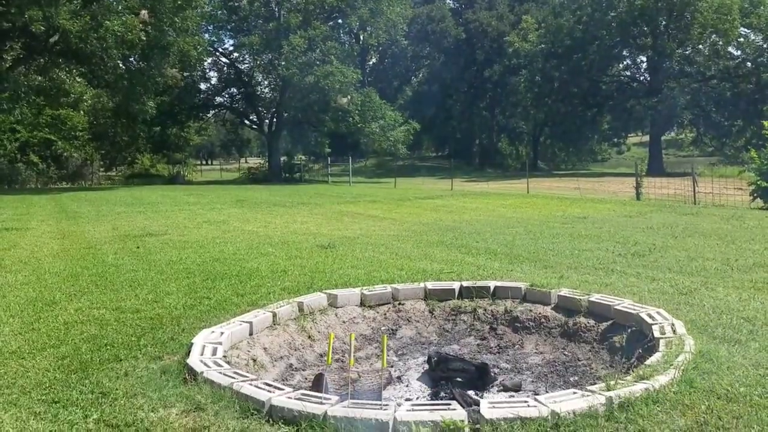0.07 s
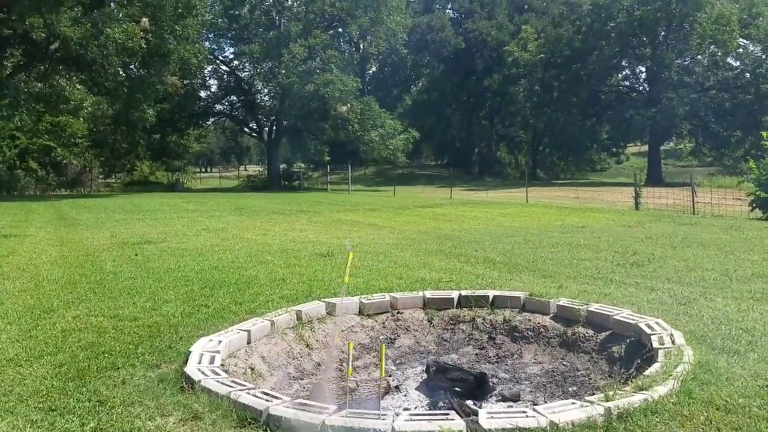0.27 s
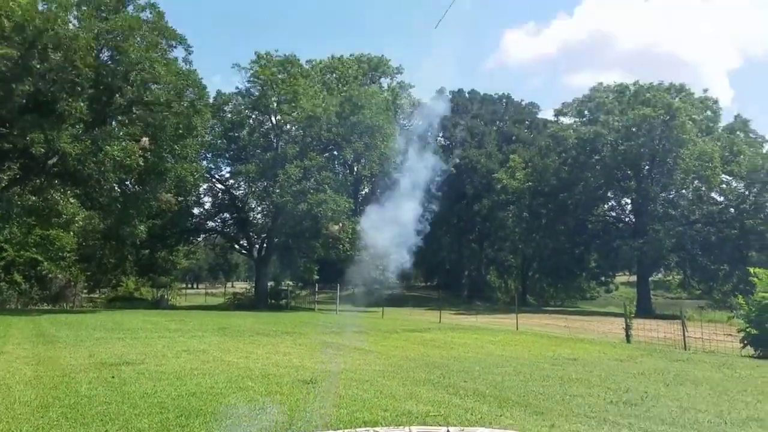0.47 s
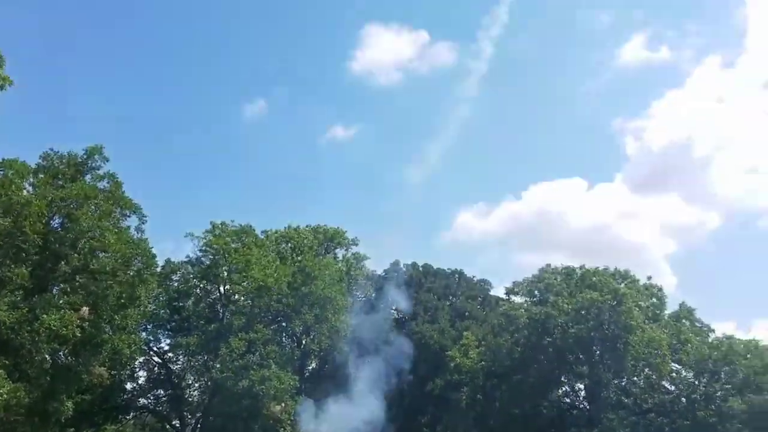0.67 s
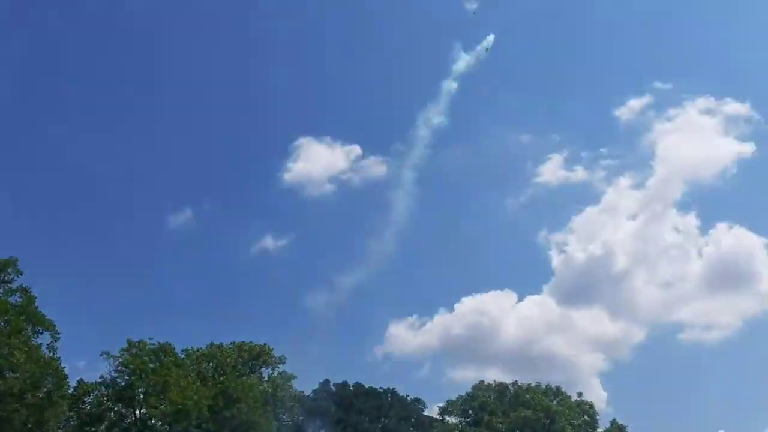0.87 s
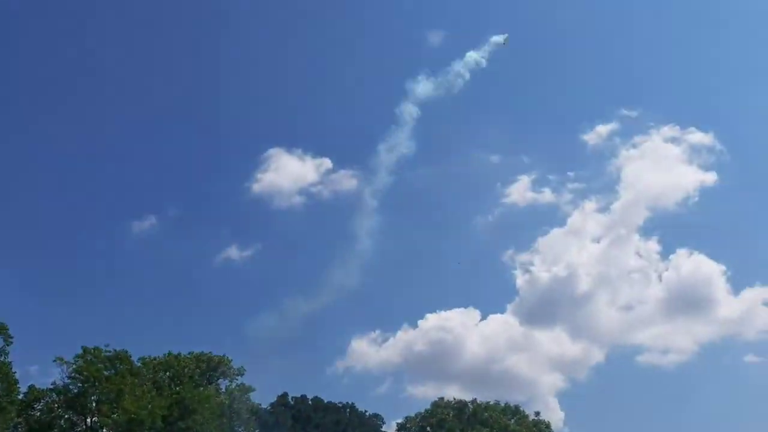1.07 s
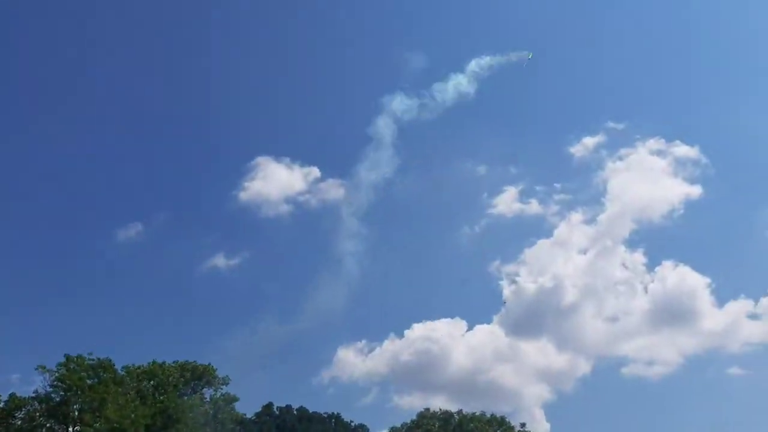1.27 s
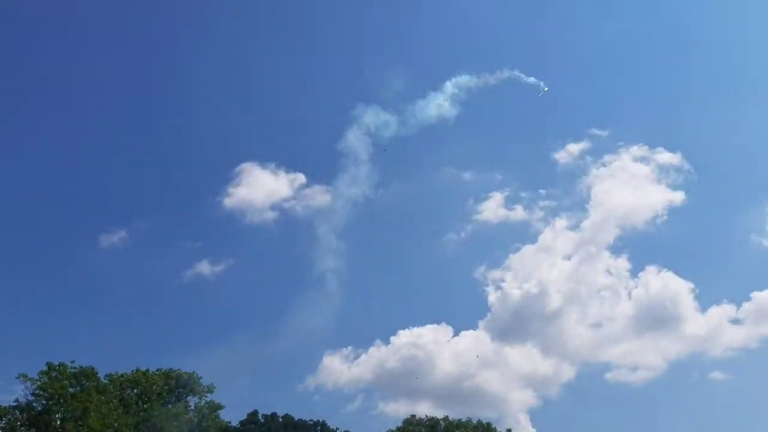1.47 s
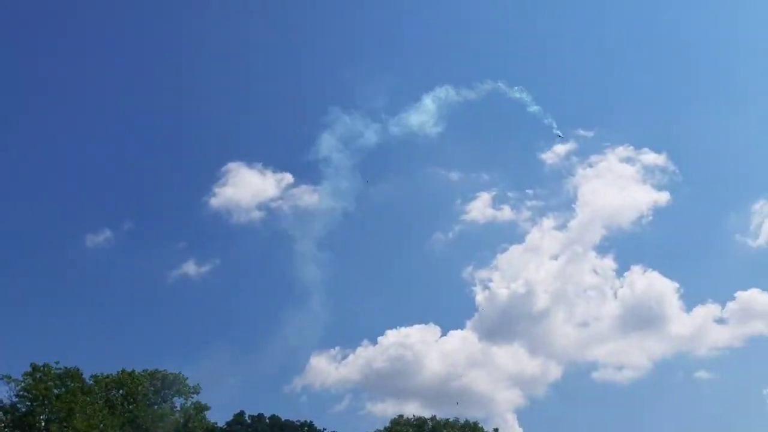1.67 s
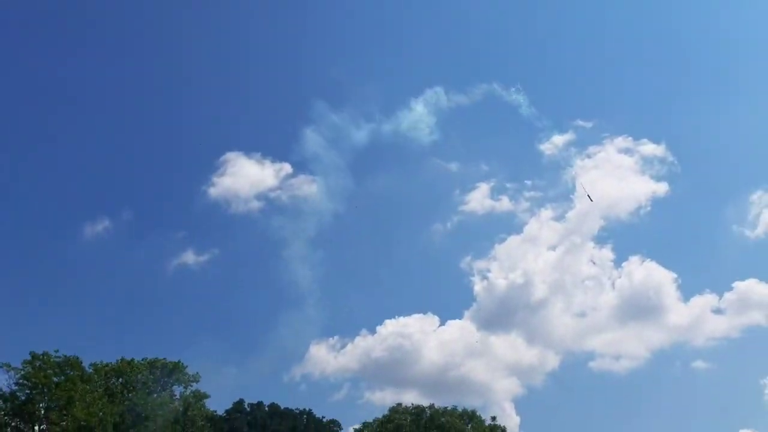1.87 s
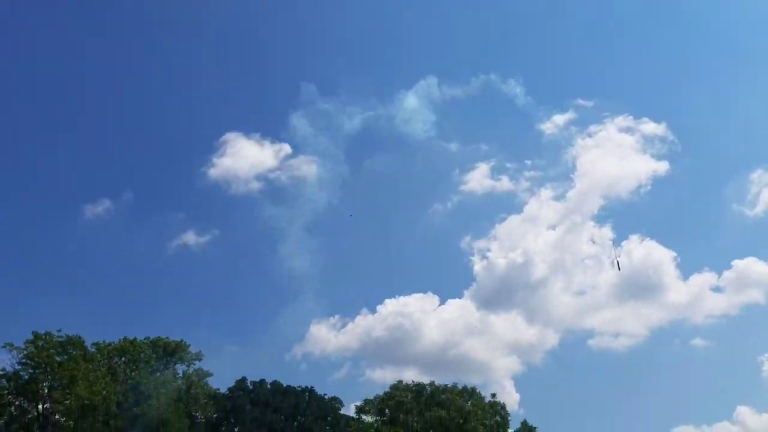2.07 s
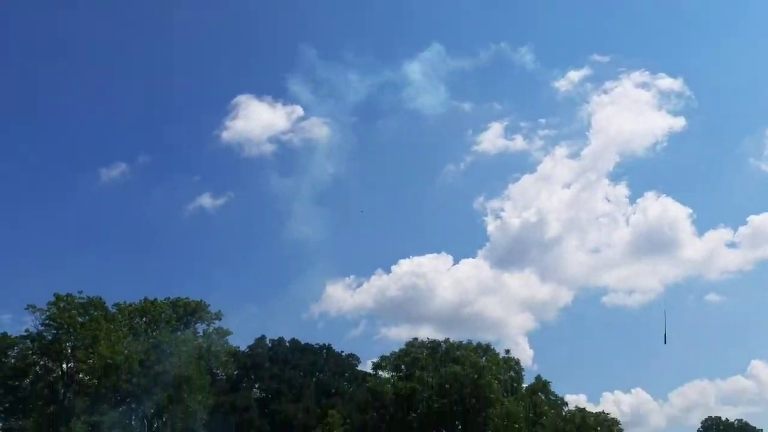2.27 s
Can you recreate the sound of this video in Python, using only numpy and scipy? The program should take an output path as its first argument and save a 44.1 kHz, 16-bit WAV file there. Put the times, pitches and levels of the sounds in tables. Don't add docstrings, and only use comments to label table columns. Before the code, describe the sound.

A small firework rocket launches in an open yard. A faint fuse fizz and the tail of a bird chirp open over low rumble. At about 0.2 seconds a harsh, crackling whoosh bursts out with a light stick knock, dulling and fading by 0.8. Two sharp cracks follow at 0.84 and 0.95, with hollow booms and quick echoes off trees, then another fuse fizz slowly rises from 1.6 until 2.3.

```python
import sys
import numpy as np
from scipy import signal
from scipy.fft import irfft
from scipy.io import wavfile
from scipy.ndimage import uniform_filter1d

SR = 44100
rng = np.random.default_rng(int(sys.argv[2]) if len(sys.argv) > 2 else 0)


def master(y):
    cut = np.clip(np.atleast_2d(y).T, -1, 1)
    pcm = np.round(cut * 32767)
    wavfile.write(sys.argv[1], SR, pcm.astype(np.int16))


def convert_level_to_amplitude(level_db):
    exponent = np.asarray(level_db, float) / 20
    return 10 ** exponent


N = 101429

# (frequency [Hz], likeness [0-1])
LIKENESS = [(60, 0.95), (300, 0.59), (700, 0.39), (2000, 0.37), (5000, 0.14), (14000, 0.64)]
# (frequency [Hz], level [dB])
LEAN_DB = [(60, 1), (180, -1), (550, 0), (1650, 1), (4970, 2.5), (15000, 2)]
# (frequency [Hz], phase [rad])
LAG_RAD = [(100, 1.4), (500, 0.25), (2500, 0.44), (6000, 1.29), (13000, 1.8)]

# (time [s], level [dB])
AIR_LEVEL = [(0, -56), (.18, -56), (.22, -76), (.3, -76), (.6, -64), (.8, -63.5), (1.05, -68), (1.3, -69),
             (1.6, -68.5), (1.76, -59.5), (2.3, -58)]
# (frequency [Hz], level [dB])
AIR_COLOUR = [(18, -33), (30, -1), (49, -13), (118, 6.5), (210, -14), (290, -4.5), (563, -13.5),
              (2080, -13), (5000, -21.5), (6500, -42), (11000, -120)]
# (start [s], length [s], from [Hz], to [Hz], level [dB])
CHIRPS = [(0, .035, 2200, 2600, -57)]
# (time [s], level [dB])
FUSE_LEVEL = [
    (0, -45.5),
    (.17, -45.5),
    (.3, -56),
    (.8, -75),
    (1.5, -75.5),
    (1.7, -63.5),
    (2.0, -60),
    (2.3, -55.5),
]
# (frequency [Hz], level [dB])
FIRST_FIZZ = [(400, -34), (1100, -37), (1600, -8), (3000, -7), (5000, -2.5), (6500, 3), (10000, 0),
              (15000, -4.5)]
# (frequency [Hz], level [dB])
SECOND_FIZZ = [(1100, -26), (3000, -9), (5000, -2.5), (6500, 6), (8000, 3.5), (10000, -5), (12500, 1.5),
               (15000, 0)]

# (time [s], level [dB], distance dullness [0-1])
THRUST = [
    (.15, -49, 0.1),
    (.21, -24.5, 0.07),
    (.25, -14.5, 0.02),
    (.30, -16, 0.08),
    (.38, -16.5, 0.3),
    (.47, -30.5, 0.27),
    (.56, -39.5, 0.88),
    (.64, -44, 1),
    (.82, -58, 0.93),
]
# (time [s], level [dB], width [s])
SURGES = [(.222, 2, 0.0052), (.262, -2, 0.013), (0.291, 1.5, .005), (.308, -0.5, .006), (.322, 3, .006),
          (.365, 2, 0.013), (.432, -3.5, 0.0058), (.447, 2.5, 0.0068), (.61, 0.5, 0.012)]
# (frequency [Hz], level [dB])
NEAR_JET = [(150, -52.5), (450, -23), (700, -35.5), (1150, -38), (1500, -2), (4500, -2.5), (6500, 2),
            (15000, -2)]
# (frequency [Hz], level [dB])
FAR_JET = [(120, -38.5), (300, -1), (700, -2), (1500, 0), (2500, -5), (4000, -9.5), (8000, -6), (15000, -7)]
CRACKLE_PER_S, CRACKLE_DB, CRACKLE_SPREAD_DB = 9700, -12, 4.5
JET_LOW_HZ = 1190
# (time [s], frequency [Hz], level [dB],
# t60 [s])
KNOCK = [(.232, 296, -33.5, 0.08), (.23, 510, -25.5, 0.096), (.222, 927, -35, 0.14), (.255, 460, -30, .15),
         (.265, 900, -37, 0.18), (.285, 1020, -41, 0.12), (.285, 540, -32, 0.17), (.346, 142, -26.5, 0.14)]
# (time [s], peak [dB], pitch [Hz], length [cycles])
SPIT = [(.2428, -10, 2600, 2.2), (.2429, -10, 5500, 2.2)]
# (frequency [Hz], level [dB])
SWEEP_COLOUR = [(60, -4), (150, 3), (250, -6.5), (600, 0), (1200, 1.5), (3000, -9), (8000, -29.5)]
SWEEP_S, SWEEP_WIDTH_S, SWEEP_DB = 0.3526, 0.014, -18.5

# (time [s], strength [dB], shock front [dB])
POPS = [
    (0.8392, -4.5, -1),
    (0.9505, -6.5, 5),
]
# (frequency [Hz], level [dB])
CRACK_COLOUR = [(100, -19.5), (400, 2), (900, -4), (2000, -1.5), (4000, -13), (7500, -23.5), (14000, -14.5)]
CRACK_S, CRACK_DB, CRACK_RELEASE_S = .0036, -12.5, 0.00037
# (port [0 left, 1 right], delay [s], step [full scale], lead-in [s], relax [s])
FRONTS = [(0, 0.0002, 0.55, 0.000079, 0.00013), (0, 0.002525, 0.38, 0.0003, 0.00083),
          (1, 0.000216, -0.34, 0.000075, 0.00052), (1, 0.00131, -0.37, 0.00061, 0.00016),
          (1, .0035, -0.39, 0.00014, 0.0007)]
# (time [s], frequency [Hz], level [dB], t60 [s])
BOOM = [(.8395, 413, -23, 0.058), (.8395, 589, -19.5, 0.058), (.951, 128, -20, 0.035),
        (.951, 572, -16.5, 0.026), (.951, 1330, -22, 0.023)]
# (delay [s], level [dB], t60 before each band's share [s], tilt above the middle [dB/octave], below it
# [dB/octave])
TAILS = [
    (.002, -21.5, 0.055, 2.5, -2.5),
    (0.012, -24, 0.48, -0.57, -1),
    (.075, -30, 0.22, -7, -3.5),
    (0.099, -46.5, 2.37, -6, -0.5),
    (0.239, -42, 0.45, -5, -6),
    (0.329, -50, 0.38, -5, 1.5),
]
# (frequency [Hz], level [dB])
SCATTER_COLOUR = [(100, -22.5), (300, -4.5), (1200, -3.5), (2100, 1.5), (3200, -2.5), (4500, -5.5),
                  (7000, -7.5), (14000, -6)]
# (frequency [Hz], share of t60 [0-1])
T60_SHARE = [(100, 0.11), (500, 0.96), (2000, 0.84), (5000, 0.97), (14000, 0.83)]
RUSTLE_PER_S, RUSTLE_DB = 900, -15
# (time [s], peak [dB], pitch [Hz], length [cycles])
GROUND = [(.8451, 0, 2300, 1.1), (.9568, -2.5, 1700, 1.1), (.9576, -8, 2200, 1.1)]
# (time [s], peak [dB], pitch [Hz], length [cycles])
ECHOES = [(.8962, -16, 2200, 1.5), (.8975, -22, 1500, 1.8), (.9655, -16, 2500, 1.5),
          (1.0068, -19, 1950, 2.4), (1.03, -26, 2300, 2.4), (1.045, -27, 2200, 2.4),
          (1.165, -38, 2000, 2.6), (1.183, -37, 2100, 2.4), (1.217, -36, 2100, 2.2),
          (1.3249, -36, 2000, 2.0), (1.3826, -43, 1880, 1.8), (1.397, -45, 2000, 2.2),
          (1.44, -49, 1900, 2.2), (1.4879, -42, 2250, 1.8), (1.5005, -44, 2400, 1.8),
          (1.5962, -46, 1900, 1.6), (1.9753, -47, 2400, 2.6), (2.0826, -47.5, 2400, 2.4)]
SMEAR_DB, SMEAR_T60_S = -15, 0.033

DUCK_AHEAD_S, DUCK_DB = .016, -14
# (frequency [Hz], level under the whole [dB])
MASK = [(100, -35), (700, -30), (1250, -27), (1300, -80), (8500, -80), (8600, -41), (12400, -41),
        (12500, -80)]
MASK_DEPTH_DB, POP_GUARD_S = -29, .05
# (frequency [Hz], level [dB])
MIC = [(30, -15), (100, -3), (8100, 2), (8600, -3.5), (10500, -2.5), (13000, 4.5), (14500, 6.5)]
EDGE_HZ, CEILING = 14540, .9


def evened(x):
    return x / np.sqrt(np.mean(x ** 2) + 1e-20)


def read(points, hz):
    f, value = np.transpose(points)
    return np.interp(np.log(hz + 1), np.log(f + 1), value)


def curve(rows, column=1):
    rows = np.array(rows)
    return np.interp(np.arange(N) / SR, rows[:, 0], rows[:, column])


def noise(colour, patchy_db, flicker_db, like=1., lean_db=0., size=256):
    frames, hz = 4 * N // size + 5, np.fft.rfftfreq(size, 1 / SR)
    a, b, c, d, patches = rng.standard_normal((frames, len(hz), 5)).T
    patches = uniform_filter1d(patches, size=5, axis=0)
    patches = evened(uniform_filter1d(patches, size=4096 // size, axis=1))
    flicker = evened(uniform_filter1d(rng.standard_normal(frames), size=1024 // size))
    same = np.clip(like * read(LIKENESS, hz), 0, 1)[:, None]
    left = a + 1j * b
    right = same * left + np.sqrt(1 - same ** 2) * (c + 1j * d)
    right = right * np.exp(-1j * read(LAG_RAD, hz))[:, None]
    lean = convert_level_to_amplitude((read(LEAN_DB, hz) + lean_db)[:, None] / 2)
    level_db = read(colour, hz)[:, None] + patchy_db * patches + flicker_db * flicker
    z = np.array([left * lean, right / lean]) * convert_level_to_amplitude(level_db)
    return evened(signal.istft(z, nperseg=size, noverlap=size * 3 // 4)[1][:, :N])


def grit(rate_per_s, depth_db, spread_db, size=8):
    grains = convert_level_to_amplitude(spread_db * np.minimum(rng.exponential(1, N), 5))
    grains = grains * (rng.random(N) < rate_per_s / SR)
    return evened(1 + convert_level_to_amplitude(depth_db) * evened(uniform_filter1d(grains, size=size)))


def rings(rows, rise_s):
    t, out = np.arange(N) / SR, np.zeros(N)
    for at, hz, db, t60 in rows:
        fade = convert_level_to_amplitude(db - 60 * np.maximum(t - at, 0) / t60)
        out += fade * np.clip((t - at) / rise_s, 0, 1) * np.sin(2 * np.pi * hz * (t - at))
    return out


def snaps(rows):
    t, out = np.arange(N) / SR, np.zeros(N)
    for at, peak_db, hz, cycles in rows:
        u = (t - at) * hz
        skewed = np.where(u < 0, 1.98 * u, u)
        out += convert_level_to_amplitude(peak_db) * np.cos(2 * np.pi * u - .4) * np.exp(-skewed ** 2 / cycles ** 2 * 2.43)
    return out * convert_level_to_amplitude(np.array([[.5], [-.5]]))


def air():
    return convert_level_to_amplitude(curve(AIR_LEVEL)) * noise(AIR_COLOUR, patchy_db=.8, flicker_db=.6, size=1024)


def bird():
    t, out = np.arange(N) / SR, np.zeros(N)
    for start, length, from_hz, to_hz, db in CHIRPS:
        u = np.clip((t - start) / length, 0, 1)
        phase = 2 * np.pi * np.cumsum(from_hz + (to_hz - from_hz) * u) / SR
        out += convert_level_to_amplitude(db) * np.sin(np.pi * u) ** .5 * np.sin(phase)
    return out


def fuses():
    late = np.arange(N) > SR
    first = noise(FIRST_FIZZ, patchy_db=1.2, flicker_db=.5, lean_db=1.0)
    second = noise(SECOND_FIZZ, patchy_db=1.0, flicker_db=0.8, lean_db=4.5)
    return convert_level_to_amplitude(curve(FUSE_LEVEL)) * np.where(late, second, first)


def motor():
    t, far = np.arange(N) / SR, np.clip(curve(THRUST, column=2), 0, 1)
    near_jet = np.sqrt(1 - far) * noise(NEAR_JET, patchy_db=2.0, flicker_db=.6, size=512)
    near_jet = near_jet * grit(CRACKLE_PER_S, CRACKLE_DB, CRACKLE_SPREAD_DB)
    near_jet = signal.sosfilt(signal.butter(4, JET_LOW_HZ, "high", fs=SR, output="sos"), near_jet)
    far_jet = np.sqrt(far) * noise(FAR_JET, patchy_db=1.2, flicker_db=1.1, size=512)
    burning = (t > THRUST[0][0] - .05) & (t < THRUST[-1][0] + .02)
    surge_db = sum(db * np.exp(-((t - at) / width) ** 2 / 2) for at, db, width in SURGES)
    return (near_jet + far_jet) * convert_level_to_amplitude(curve(THRUST) + surge_db) * burning


def knock():
    return rings(KNOCK, rise_s=0.011)


def spit():
    return snaps(SPIT)


def exhaust_sweep():
    gust = np.exp(-((np.arange(N) / SR - SWEEP_S) / SWEEP_WIDTH_S) ** 2 / 2)
    return convert_level_to_amplitude(SWEEP_DB) * gust * noise(SWEEP_COLOUR, patchy_db=3.0, flicker_db=3.0, size=1024)


def pops():
    t, out = np.arange(N) / SR, np.zeros((2, N))
    crack = noise(CRACK_COLOUR, patchy_db=1.5, flicker_db=1.5, like=.3, lean_db=-1.1)
    for start, strength_db, front_db in POPS:
        gate = (t > start) * np.clip((start + CRACK_S - t) / CRACK_RELEASE_S + 1, 0, 1)
        out += convert_level_to_amplitude(strength_db + CRACK_DB) * crack * gate
        for port, delay, step, lead_in, relax in FRONTS:
            u = t - start - delay
            bell = np.exp(-(u / np.where(u < 0, lead_in, relax)) ** 2)
            out[port] += convert_level_to_amplitude(front_db) * step * np.tanh(u / .00004) * bell
    return out


def case_boom():
    return rings(BOOM, rise_s=0.0021) * convert_level_to_amplitude(np.array([[2.5], [-2.5]]))


def scatter():
    t, out = np.arange(N) / SR, np.zeros((2, N))
    rustle = grit(RUSTLE_PER_S, RUSTLE_DB, spread_db=3.0, size=40)
    for delay, level_db, t60, tilt_db, low_db in TAILS:
        rough = rustle * noise(SCATTER_COLOUR, patchy_db=2.0, flicker_db=1.1, like=0.12)
        hz, at, z = signal.stft(rough, SR, nperseg=128, noverlap=96)
        octaves = np.log2(np.maximum(hz, 500) / 2200)[:, None]
        dull_db = np.where(octaves > 0, tilt_db, -low_db) * octaves
        band_t60 = t60 * read(T60_SHARE, hz)[:, None]
        fade = 0
        for start, strength_db, _ in POPS:
            u = at - start - delay
            fade_db = strength_db + 7 + level_db + dull_db - 60 * np.maximum(u, 0) / band_t60
            fade = fade + convert_level_to_amplitude(fade_db) * np.clip(u / min(delay, .04) + 1, 0, 1) ** 2
        out += signal.istft(z * fade, SR, nperseg=128, noverlap=96)[1][:, :N] * (t > POPS[0][0])
    return out


def echoes():
    t, smear = np.arange(N) / SR, np.zeros(N)
    for at, peak_db, _, _ in GROUND + ECHOES:
        smear += convert_level_to_amplitude(peak_db + SMEAR_DB - 60 * np.maximum(t - at, 0) / SMEAR_T60_S) * (t > at)
    rough = noise(CRACK_COLOUR, patchy_db=1.5, flicker_db=2.5, lean_db=-1.5)
    return snaps(GROUND + ECHOES) + smear * rough


def scene():
    ahead = (POPS[0][0] - np.arange(N) / SR) / DUCK_AHEAD_S
    dip = convert_level_to_amplitude(DUCK_DB * np.clip(4 * (1 - ahead), 0, 1) * (ahead > 0))
    quiet = air() + bird() + fuses() + motor() + knock() + exhaust_sweep()
    return dip * quiet + spit() + pops() + case_boom() + scatter() + echoes()


def masked(x):
    hz, at, z = signal.stft(x, SR, nperseg=2048, noverlap=1024)
    power = (abs(z) ** 2).sum(axis=0)
    band = np.repeat(power[:-1].reshape(256, 4, -1).sum(axis=1), repeats=4, axis=0)
    band_db = 10 * np.log10(np.vstack([band, band[-1:]]) / power.sum(axis=0) + 1e-12)
    under_db = read(MASK, hz)[:, None] - band_db
    clear_of_pops = abs(at - np.array(POPS)[:, :1]).min(axis=0) > POP_GUARD_S
    keep = convert_level_to_amplitude(MASK_DEPTH_DB * np.clip(under_db / 2, 0, 1) * clear_of_pops)
    return x - signal.istft(z * (1 - keep), SR, nperseg=2048, noverlap=1024)[1][:, :N]


def low_pass(x):
    return signal.sosfilt(signal.butter(12, 15900, fs=SR, output="sos"), x)


def record(dry):
    colour = irfft(convert_level_to_amplitude(read(MIC, np.fft.rfftfreq(512, 1 / SR))))
    colour = np.roll(colour, 256) * np.hanning(513)[:512]
    band_limit = signal.firwin(301, EDGE_HZ, window=("kaiser", 9), fs=SR)
    taps = np.convolve(colour, band_limit)[1:]
    steady = signal.sosfilt(signal.butter(2, 45, "high", fs=SR, output="sos"), dry)
    held = CEILING * np.tanh(steady / CEILING)
    mix = masked(signal.oaconvolve(held, taps[None], "same"))
    return low_pass(mix)


dry = scene()
out = record(dry)
master(out)
```